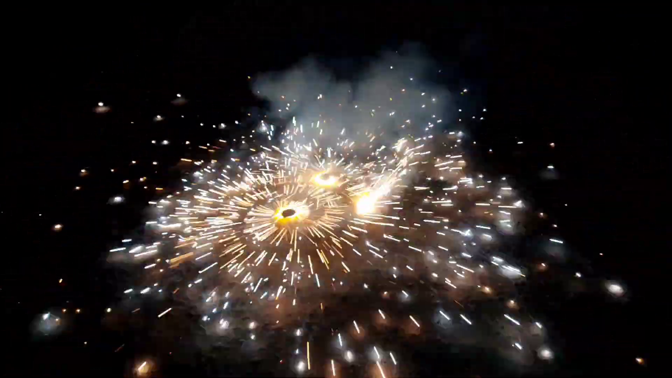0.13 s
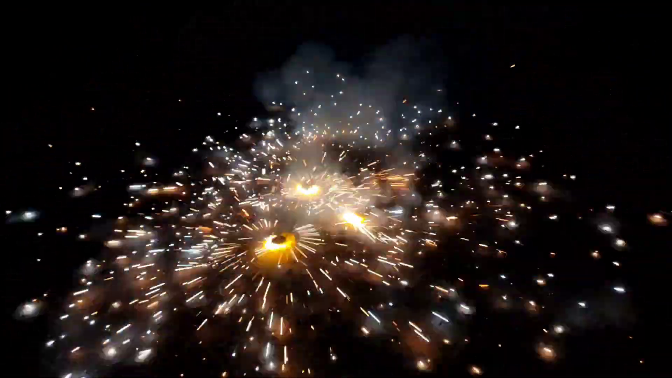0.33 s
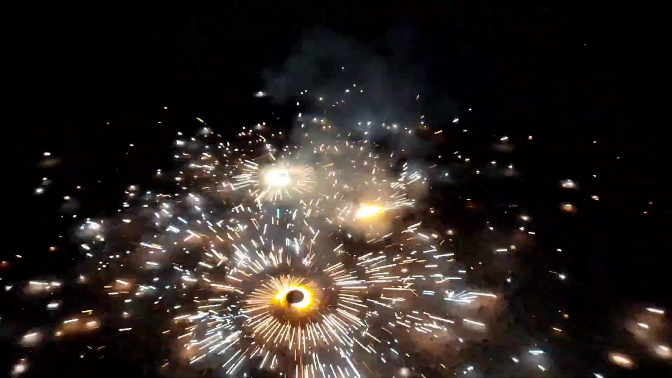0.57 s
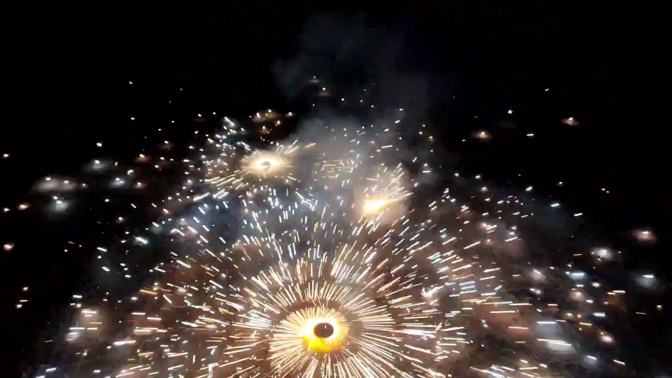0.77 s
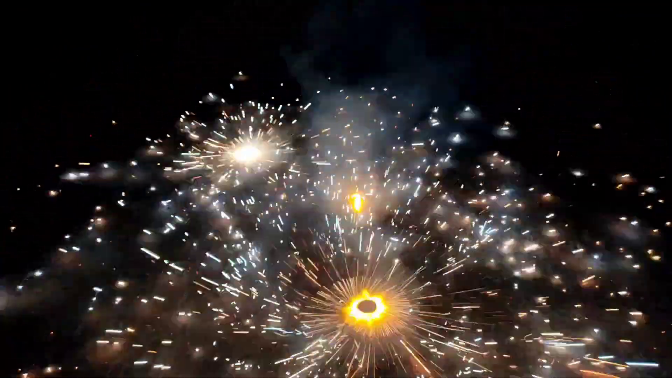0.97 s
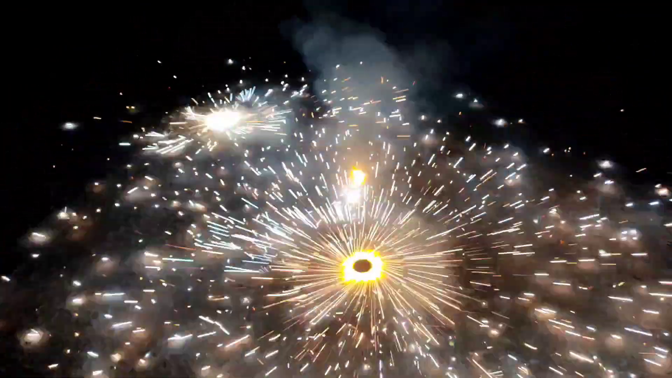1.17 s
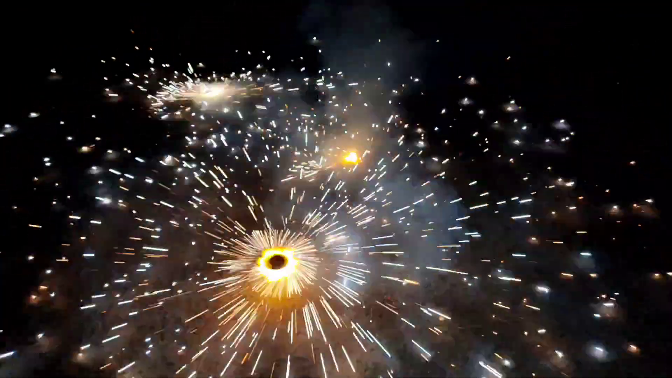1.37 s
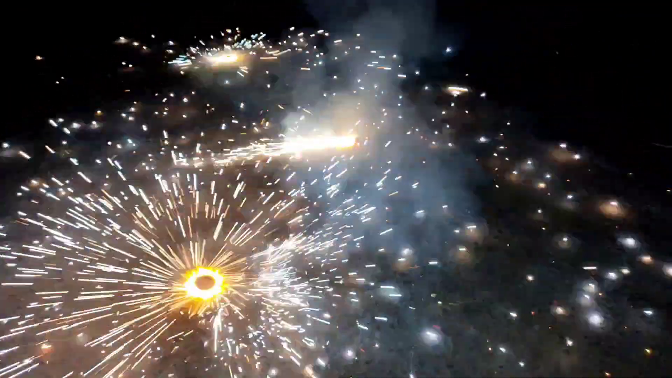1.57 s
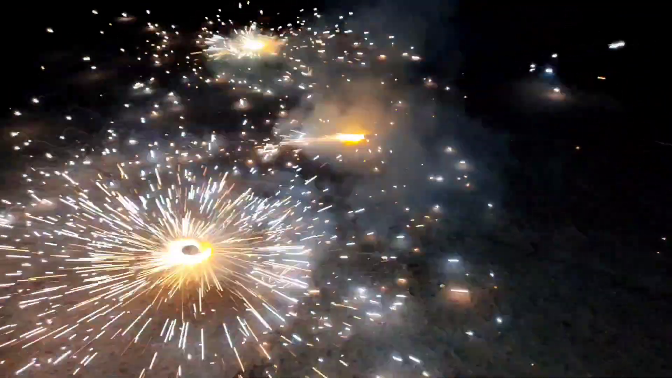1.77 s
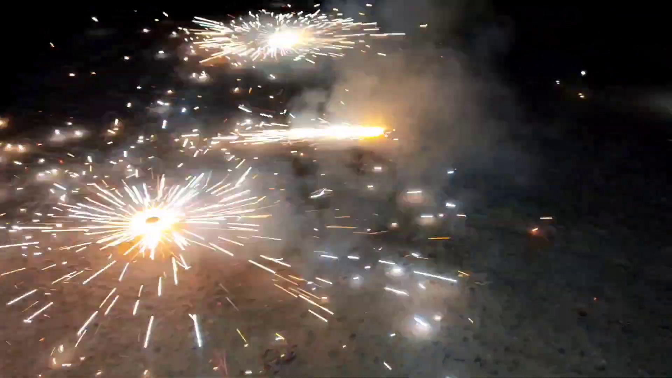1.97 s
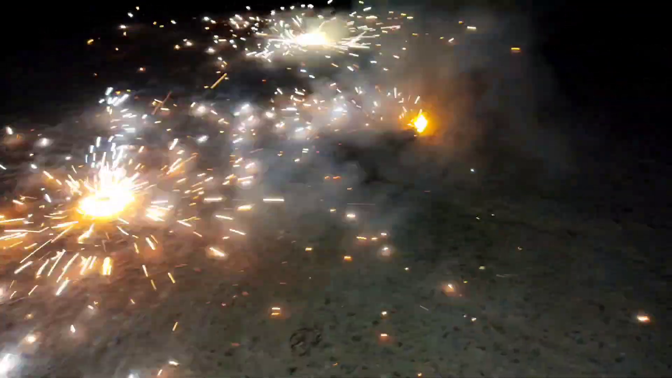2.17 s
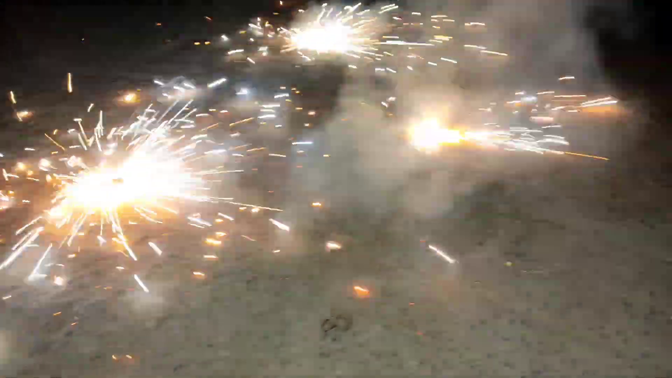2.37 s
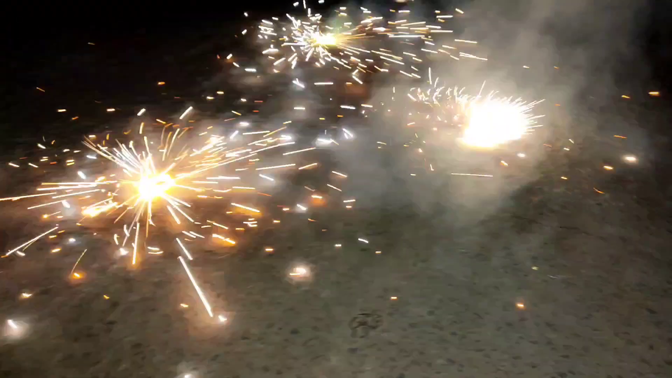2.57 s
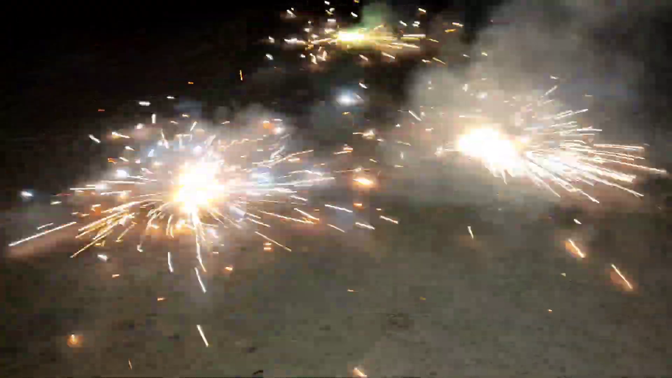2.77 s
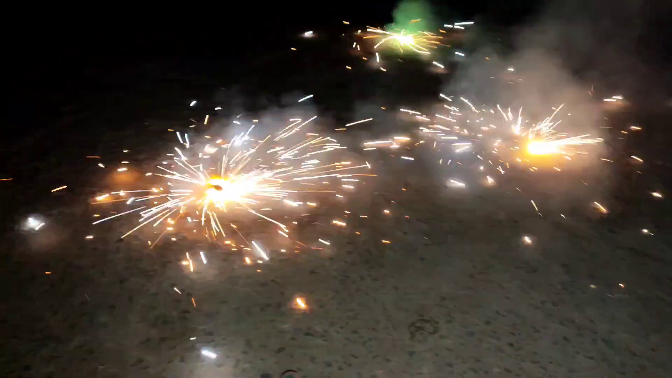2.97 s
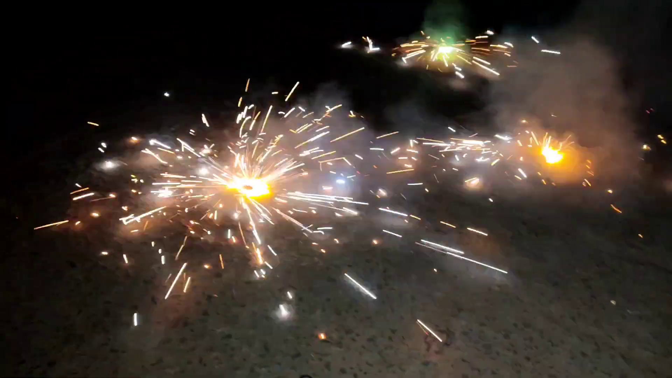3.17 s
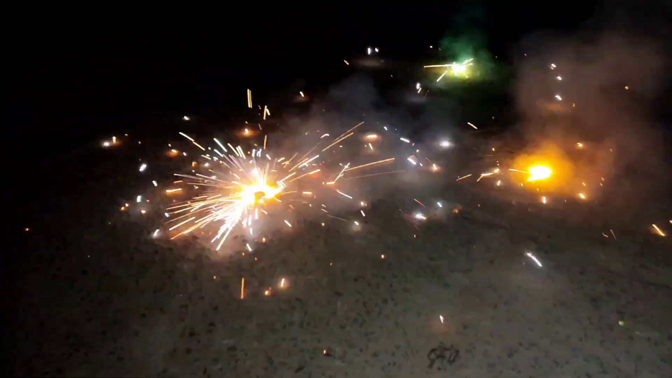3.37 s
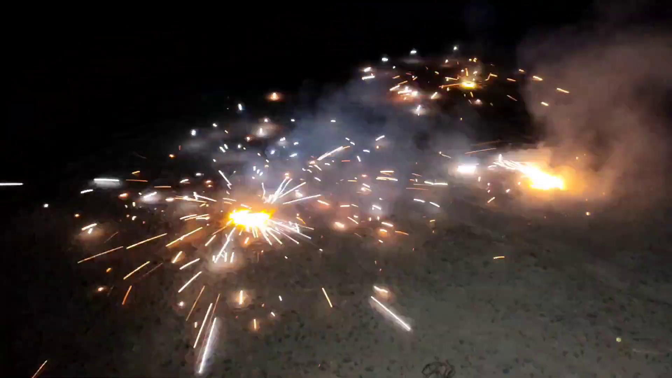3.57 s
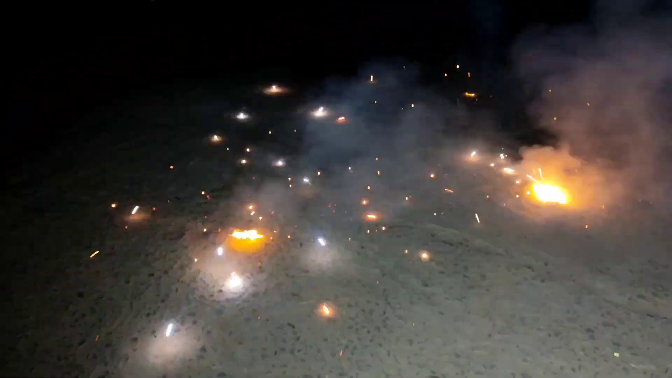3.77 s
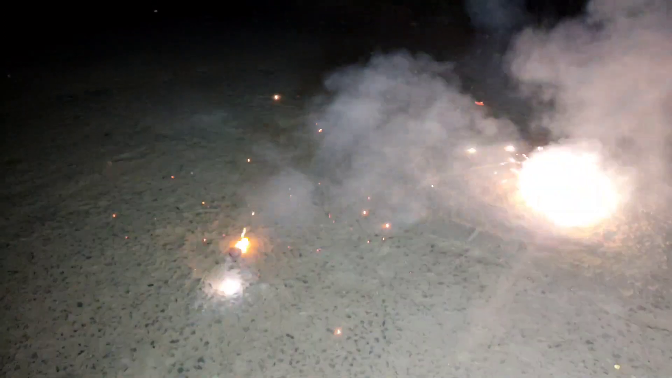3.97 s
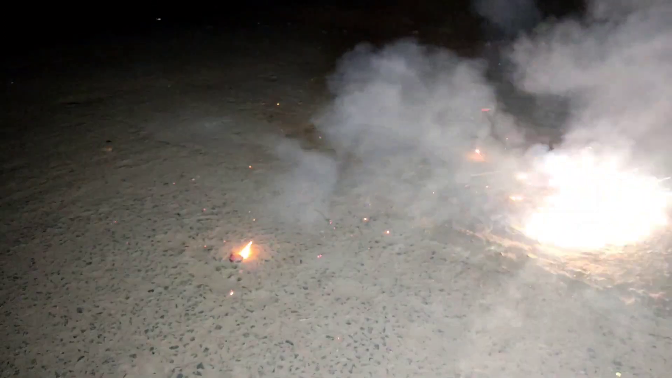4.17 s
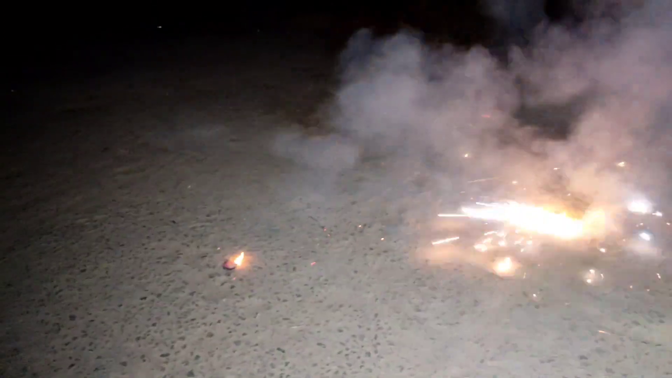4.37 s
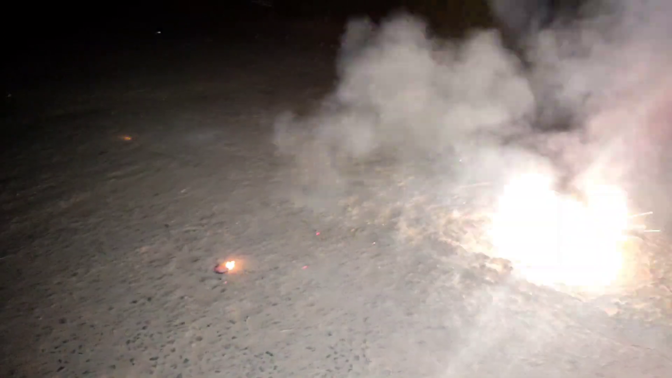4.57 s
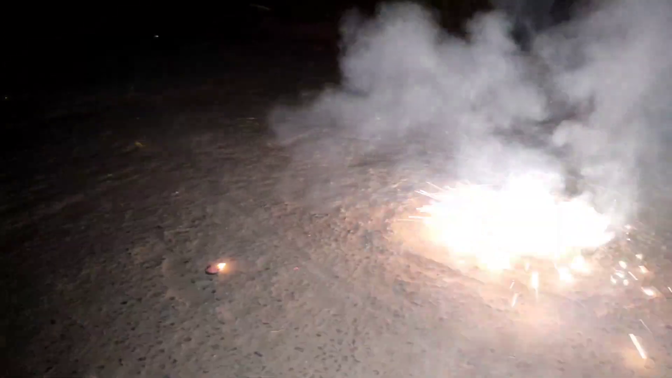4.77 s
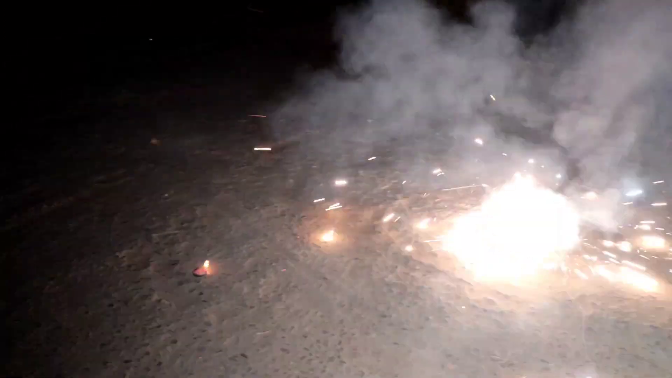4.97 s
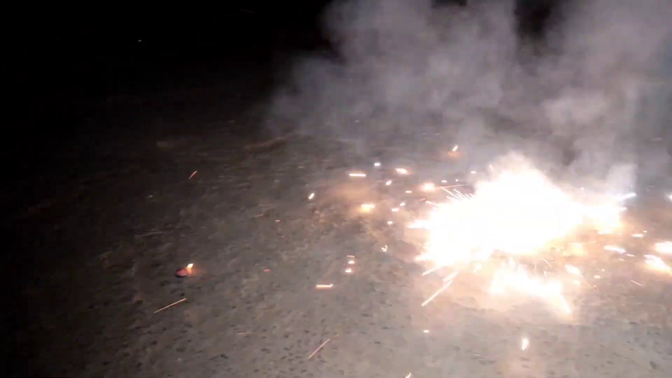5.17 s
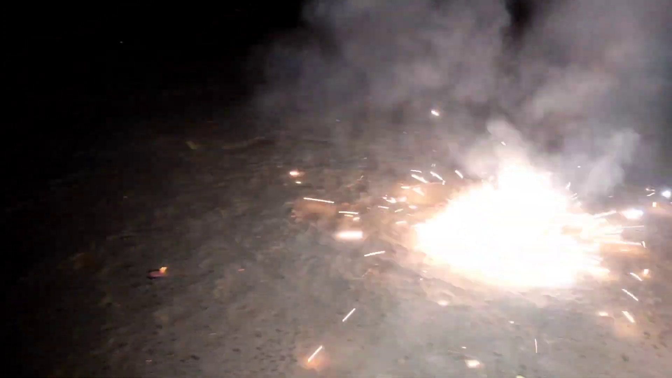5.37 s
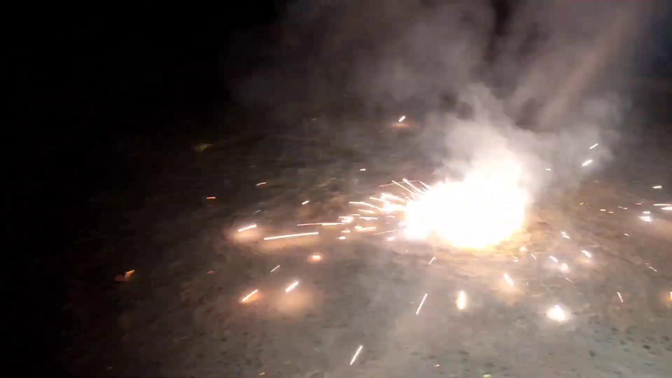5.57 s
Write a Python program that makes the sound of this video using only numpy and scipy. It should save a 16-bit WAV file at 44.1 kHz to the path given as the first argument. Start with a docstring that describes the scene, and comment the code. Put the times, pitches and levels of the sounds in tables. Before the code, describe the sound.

A bright, sizzling spray of sparks and a fluttering rush of burning gas come from ground spinner fireworks wandering near the microphone in an open yard. They surge and spit irregularly, loudest early on, then weaken and die away. A single spinner takes over on the left with a softer hiss that flares, fades and flares again. Light low air rumble and very short echoes lie underneath.

```python
"""A pulsing roar and a bright, crackling hiss: ground spinner fireworks whirl on a concrete yard at night.
Burning gas rushes from each nozzle, pulsing as it turns, and grains of metal burst into spitting sparks.
The group wanders and burns out after four seconds; one last spinner then flares up alone, to the left.
Low gusts and short echoes lie underneath. Two small microphone ports ring near 7-8 kHz."""
import sys
import numpy as np
from scipy import signal
from scipy.fft import rfft, irfft, next_fast_len
from scipy.io import wavfile
from scipy.ndimage import uniform_filter1d, minimum_filter1d, map_coordinates

SR = 44100
rng = np.random.default_rng(int(sys.argv[2]) if len(sys.argv) > 2 else 0)


def dump(signal):
    """Clip the signal to [-1, 1] and save it as 16-bit WAV at the path in sys.argv[1]."""
    limited = np.clip(np.atleast_2d(signal).T, -1, 1)
    pcm = np.round(limited * 32767).astype(np.int16)
    wavfile.write(sys.argv[1], SR, pcm)


N = 247384
TIME = np.arange(N) / SR

# How hard the group's gas burns: time_s, rumble_db, roar_db, rasp_db
GROUP_JET = [(0.0, -43, -33.5, -31), (0.3, -43, -30, -31), (0.41, -41.5, -32.5, -33),
             (0.65, -37.5, -29, -27), (0.79, -35, -28, -29), (0.825, -40, -27, -25.5),
             (0.95, -34, -25.5, -23), (1.0, -33.5, -26.5, -25.5), (1.08, -38, -31.5, -28.5),
             (1.28, -37.5, -32, -28), (1.47, -35.5, -32, -30), (1.52, -37, -31, -45),
             (1.6, -35.5, -30, -35), (1.82, -34.5, -30, -33.5), (2.05, -34.5, -26.5, -31),
             (2.42, -39, -32, -32.5), (3.36, -43.5, -36.5, -32.5), (3.52, -41, -41.5, -39),
             (3.66, -40.5, -34.5, -34), (3.81, -37.5, -34.5, -38), (3.87, -40.5, -38, -44),
             (4.0, -46, -47.5, -56.5)]
# Where the group is: time_s, extra_path_to_left_m, left_minus_right_db, direct_over_scattered_db
GROUP_PATH = [(0, 0.0015, 3, 3.5), (.3, 0.0056, 3.5, -2.5), (.75, 0.022, -1.5, -5.5), (1.1, -0.0078, 0, 0),
              (1.42, -0.0089, -0.5, 5.5), (1.7, 0.036, -2, -2), (1.95, 0.044, -3.5, -5),
              (2.3, 0.069, -3, -3.5), (2.6, 0.094, -2, 0), (2.9, 0.061, -3.5, 0), (3.35, 0.045, -1, 12.5),
              (4.0, 0.033, -2.5, -11.5)]
# The nearest spinner speeds up, then tires: time_s, turns_per_s
GROUP_SPIN = [(0, 60), (.45, 73), (.8, 78), (1.1, 88), (1.33, 103), (1.55, 108), (1.76, 87), (1.9, 48),
              (2.6, 24), (3.5, 22), (4.0, 16)]
# The group's steady stream of sparks: time_s, level_db
GROUP_SPRAY = [(0, -24), (.2, -23.5), (.41, -29.5), (.62, -25.5), (.9, -18.5), (1.14, -25.5), (1.45, -29),
               (1.52, -26), (1.66, -29.5), (1.76, -30), (1.85, -35.5), (1.91, -29), (1.97, -30.5),
               (2.12, -29), (2.3, -33.5), (2.45, -35), (2.65, -32.5), (3.4, -33), (3.52, -41.5),
               (3.62, -37), (3.85, -42), (4.0, -57)]
# Tone of the group's gas: pitch_hz, level_db
GROUP_ROAR = [(60, -31), (115, -19.5), (165, -2.5), (230, -2.5), (310, -3), (400, -7), (490, 0), (800, 3),
              (1100, 6), (1500, 0.5), (2700, -1.5), (3200, -17), (3900, -19), (6000, -12), (8000, -50)]
# Tone of the group's spray: pitch_hz, level_db
GROUP_HISS = [(2200, -25), (3200, -4), (4500, -2.5), (5800, -1.5), (7000, 0), (8000, .5), (9000, 0),
              (11000, -7), (15500, -9)]

def group(flare):
    """Several spinners blow out gas and sparks, pulsing with the turns of the nearest."""
    path_m, balance_db, direct_db = in_time(GROUP_PATH)
    sweep_db = whirl(in_time(GROUP_SPIN)[0], depths_db=[0.24, 0.52, 0.56, 0.3])
    gas = jet(in_time(GROUP_JET), flare, GROUP_ROAR, path_m, direct_db, 0.52 * sweep_db,
              flutter_db=0.6, gains_db=[-0.8, -1.8, -0.3], hollowness=1.74)
    flow = metal_flow(in_time(GROUP_SPRAY)[0], flare)
    hiss = spray(flow, GROUP_HISS, path_m, direct_db, sweep_db,
                 crackle_db=-8.5, hiss_db=-10.5, patchy_db=31.0)
    return gas + panned(hiss, balance_db)


# The last spinner flares, fades and flares again: time_s, rumble_db, roar_db, rasp_db
LAST_JET = [(4.0, -48, -54, -54), (4.1, -47.5, -38.5, -40), (4.21, -46.5, -43.5, -42),
            (4.49, -47, -34.5, -37), (4.64, -49, -44, -48), (4.74, -47.5, -45, -45.5),
            (4.87, -52, -42.5, -41.5), (4.95, -50, -36.5, -40), (5.06, -47, -39, -41),
            (5.14, -48.5, -38.5, -36.5), (5.61, -47.5, -36, -38)]
# Where it is: time_s, extra_path_to_left_m, left_minus_right_db, direct_over_scattered_db
LAST_PATH = [(4.0, -0.064, 2.8, 0.71), (4.5, -0.065, 6.1, 0.85), (5.0, -0.063, 6, 0.88),
             (5.6, -0.039, 3.8, 1)]
# Tone of its gas: pitch_hz, level_db
LAST_ROAR = [(60, -20), (115, -14.5), (160, -3), (260, 2), (390, -3.5), (500, 2.5), (900, 1.5), (1130, 7.5),
             (1400, 1), (1800, 1.5), (2800, -2), (3400, -23), (5000, -14.5), (7000, -17.5)]
# Tone of its spray: pitch_hz, level_db
LAST_HISS = [(2200, -18), (3200, -2), (3700, -3), (4300, -.5), (5800, 0), (6700, -1.5), (7500, 1),
             (8500, 0), (10000, -6.5), (15500, -9)]

def last_spinner(flare):
    """One slow spinner burns to the left; a harder burn drives it faster."""
    path_m, balance_db, direct_db = in_time(LAST_PATH)
    levels_db = in_time(LAST_JET)
    rasp_db = levels_db[2]
    turns_per_s = 26 * 2 ** ((rasp_db + 31.5) / 11.5)   # 11.5 dB more rasp doubles the speed
    sweep_db = whirl(turns_per_s, depths_db=[.6, .5])
    gas = jet(levels_db, flare, LAST_ROAR, path_m, direct_db, 0.13 * sweep_db,
              flutter_db=1.03, gains_db=[-0.8, -1.5, -0.3], hollowness=0.83)
    flow = metal_flow(rasp_db - 1.8, flare)
    hiss = spray(flow, LAST_HISS, path_m, direct_db, sweep_db,
                 crackle_db=-18.5, hiss_db=-6.5, patchy_db=6.5)
    return panned(gas, 0.19 * balance_db) + panned(hiss, balance_db)


def whirl(turns_per_s, depths_db):
    """The level swings, in dB, as the nozzle sweeps past; its narrow beam adds faster ripples."""
    angle = 2 * np.pi * np.cumsum(turns_per_s) / SR
    return sum(db * np.cos(k * angle + rng.uniform(0, 2 * np.pi)) for k, db in enumerate(depths_db, 1))


# A hollow note in the roar, shifting as the spinners wander: time_s, pitch_hz
HOLLOW_NOTE = [(0, 460), (1.2, 524), (2.0, 550), (2.4, 580), (3.3, 610), (3.7, 590), (5.6, 620)]

def jet(levels_db, flare, spectrum, path_m, direct_db, sweep_db, flutter_db, gains_db, hollowness):
    """Burning gas: low rumble, hollow roar and high rasp, all shaken by the uneven burn."""
    rest = resonance(turbulence(spectrum, path_m, direct_db), HOLLOW_NOTE, width_hz=166, boost=hollowness)
    bands = []
    for edge_hz in (380, 1400):   # split off the rumble, then the roar
        low = signal.sosfiltfilt(signal.butter(4, edge_hz, fs=SR, output="sos"), rest)
        bands.append(low)
        rest = rest - low
    bands.append(patchy(rest, depth_db=4.0))
    rumble, roar, rasp = [from_db(db + gain) for db, gain in zip(levels_db, gains_db)]
    rasp = np.hypot(rasp, from_db(-16.5) * flare)   # flares feed the rasp
    gas = sum(level * rms_one(band) for band, level in zip(bands, (rumble, roar, rasp)))
    return gas * from_db(sweep_db + flutter_db * drift(rate_hz=42))


# A bright ring in the hiss, wandering with the spinners: time_s, pitch_hz
HISS_PEAK = [(0, 6300), (.3, 6400), (.55, 8600), (.72, 6950), (1.0, 7400), (1.1, 7300), (1.36, 6150),
             (1.52, 8350), (1.9, 7740), (2.21, 6900), (2.56, 8800), (2.67, 6500), (2.87, 7400),
             (3.35, 7700), (3.8, 7400), (4.1, 6700), (4.46, 8350), (4.8, 7700), (5.6, 7800)]

def spray(flow, spectrum, path_m, direct_db, sweep_db, crackle_db, hiss_db, patchy_db):
    """Burning metal sprays out: a sputtering hiss with the crackle of sparks in it."""
    hiss = from_db(hiss_db) * patchy(turbulence(spectrum, path_m, direct_db), patchy_db)
    ticks = sparks(per_s=1500, spread_db=1.0, path_m=path_m)
    crackle = from_db(crackle_db) * rms_one(colour(ticks, spectrum))
    return resonance(hiss + crackle, HISS_PEAK, width_hz=2400, boost=0.51) * flow * from_db(sweep_db)


def metal_flow(steady_db, flare):
    """Loudness of the burning metal: a sputtering stream with the flares on top."""
    sputter_db = -0.4 * drift(rate_hz=30)
    return np.hypot(from_db(steady_db + sputter_db), from_db(-4) * flare)


def sparks(per_s, spread_db, path_m):
    """Grains of metal burst at random: many tiny ticks and a few strong ones."""
    sizes = from_db(spread_db * np.minimum(rng.exponential(1, N), 5)) * rng.choice([-1, 1], N)
    ticks = sizes * (rng.random(N) < per_s / SR)
    return rms_one(yard(at_ports(ticks, path_m), fade_s=0.12, wet_db=5.0))


# Lumps of powder flaring in a nozzle: start_s, length_s, level_db
FLARES = [(0.0, 0.013, -17), (0.082, 0.045, -20.5), (0.435, 0.16, -25), (0.635, 0.065, -20.5),
          (0.705, 0.062, -27), (0.812, 0.1, -18), (0.945, 0.046, -21), (1.068, 0.039, -21),
          (1.19, 0.1, -18.5), (1.305, 0.084, -19), (1.44, 0.041, -21.5), (1.512, 0.056, -26.5),
          (1.562, 0.039, -20.5), (1.705, 0.049, -23), (2.145, 0.11, -24.5), (2.485, 0.036, -23.5),
          (2.525, 0.07, -19), (2.617, 0.023, -21), (2.66, 0.018, -22), (2.70, 0.018, -23),
          (2.735, 0.023, -28), (2.802, 0.076, -22), (2.895, 0.018, -25), (2.932, 0.031, -23),
          (2.974, 0.014, -19), (3.09, 0.027, -31), (3.142, 0.012, -24), (3.222, 0.071, -24.5),
          (3.312, 0.045, -24), (3.392, 0.022, -24), (3.435, 0.017, -27), (3.658, 0.087, -32),
          (3.76, 0.028, -36), (3.806, 0.024, -32), (4.098, 0.058, -36.5), (4.31, 0.14, -29.5),
          (4.415, 0.078, -25.5), (4.758, 0.032, -32), (5.098, 0.079, -33), (5.298, 0.075, -32.5),
          (5.468, 0.066, -32), (5.572, .04, -29)]
# Sharp spits, as a grain of metal bursts in the nozzle: start_s, length_s, level_db
SPITS = [(0.639, 0.0053, -16.5), (0.751, .004, -24), (0.812, .007, -16.5), (0.831, 0.0072, -14),
         (0.958, .006, -22), (1.214, 0.0045, -19), (1.266, .005, -14.5), (1.337, 0.01, -19),
         (1.734, .005, -17.5), (2.098, 0.0037, -32), (2.176, .004, -18), (2.213, .01, -18.5),
         (2.235, .007, -23), (2.579, 0.01, -19.5), (2.828, 0.0038, -13), (2.853, .003, -22),
         (2.861, .003, -25), (2.941, 0.0076, -22), (3.11, .008, -22), (3.265, 0.0043, -19),
         (3.349, .004, -28), (3.364, 0.0098, -23), (3.409, .006, -32), (3.809, .006, -32), (3.9, .007, -39),
         (4.013, .002, -50), (4.102, .007, -37), (5.122, 0.0087, -30), (5.322, 0.014, -31),
         (5.345, .008, -32), (5.482, .011, -30)]

def flare_ups():
    """Loudness of the sudden surges: powder flares softly, metal spits sharply."""
    powder = swells(FLARES, attack_s=.004, release_s=.014)
    metal = swells(SPITS, attack_s=.001, release_s=.006)
    return np.hypot(powder, metal)


# Strength and side of the lower hiss: time_s, boost_db, left_minus_right_db
LOW_HISS = [(0, -1.5, -1), (.4, 0.5, -3.5), (.75, 2.5, 1), (.85, 1, 3), (1.1, 2, -0.5), (1.4, 2, -0.5),
            (1.53, 0.5, 1), (1.8, 2.5, 1), (2.2, 3.5, 1.5), (2.4, 7.5, 3), (2.55, 0, 0), (2.8, 2.5, 1),
            (3.8, 4, -0.5), (4.45, 1, -2.5), (4.7, 2.5, -2), (5.0, 2, -3.5), (5.4, 2.5, -2)]

def low_hiss(x):
    """The lower part of the hiss fills out, thins and leans from side to side."""
    boost_db, balance_db = in_time(LOW_HISS)
    band = signal.sosfiltfilt(signal.butter(2, (2900, 6000), "band", fs=SR, output="sos"), x)
    return x - band + from_db(boost_db) * panned(band, balance_db)


# Share of the finest sparks in the spray: time_s, share_db
FINE_SPARKS = [(0, 0.5), (.3, -3), (.6, -9.5), (1.0, -2), (1.55, -0.5), (1.85, -2), (2.3, -5), (3.7, 1),
               (4.4, -13), (5.0, -7), (5.15, -5.5), (5.6, -7)]
# Tone of their sizzle: pitch_hz, level_db
FIZZ_TONE = [(7500, -58), (9600, 2.5), (11000, 4.5), (15500, 6)]

def fizz(flare):
    """Clusters of tiny sparks sizzle above the hiss, swelling and thinning with the burn."""
    share_db, = in_time(FINE_SPARKS)
    rasp_db = in_turn(GROUP_JET, LAST_JET)[2]
    path_m = in_turn(GROUP_PATH, LAST_PATH)[0]
    ticks = sparks(per_s=7000, spread_db=4.6, path_m=path_m)
    cloud = patchy(colour(ticks, FIZZ_TONE), depth_db=9)
    return cloud * metal_flow(rasp_db + 3.5, flare) * from_db(share_db + 3.0 * drift(rate_hz=14))


# Low puffs from a nozzle: start_s, length_s, level_db
CHUFFS = [(0.945, 0.052, -36), (2.68, 0.022, -40), (3.785, .016, -36), (5.292, 0.022, -43)]
# Tone of a puff: pitch_hz, level_db
CHUFF_TONE = [(60, -25), (120, -23), (190, -3), (330, 1.5), (600, -15), (1400, -51)]

def chuffs():
    """A choking nozzle coughs out short, low puffs of gas."""
    gas = turbulence(CHUFF_TONE, path_m=0, direct_db=2)
    return gas * swells(CHUFFS, attack_s=0.0027, release_s=0.0087)


# Gusts of hot air under the roar: start_s, length_s, level_db
GUSTS = [(0.0, 0.14, -48), (0.3, 0.22, -49), (0.84, 0.11, -41), (0.965, 0.04, -37), (1.09, 0.42, -44.5),
         (1.62, 0.17, -46), (1.93, 0.14, -42), (2.3, 0.26, -54), (2.98, 0.042, -44), (3.42, 0.33, -51.5),
         (3.77, 0.039, -50)]
# Tone of the moving air: pitch_hz, level_db
GUST_TONE = [(15, -30), (28, -16), (55, -0.5), (85, 9), (120, 6), (200, -41), (600, -70)]

def gusts():
    """Low, lumpy air noise: a draught that follows the rumble, plus single gusts."""
    draught = from_db(in_turn(GROUP_JET, LAST_JET)[0] - 18)
    level = np.hypot(draught, swells(GUSTS, attack_s=0.022, release_s=0.04))
    air = turbulence(GUST_TONE, path_m=0, direct_db=2)
    return air * level * from_db(-3.0 + 1.5 * drift(rate_hz=13.0))


# Sound bounced off ground and walls: pitch_hz, level_over_direct_db
SCATTER = [(60, -29), (150, -72), (300, -38), (600, -21.5), (1200, -6.5), (2300, 0), (3400, -6), (4500, -3),
           (7000, -0.5), (8500, 5.5), (15000, -36)]

def turbulence(spectrum, path_m, direct_db):
    """Noise of swirling gas: part arrives straight, part is scattered and differs at each port."""
    direct_share = [(hz, -10 * np.log10(1 + from_db(db) ** 2)) for hz, db in SCATTER]
    direct = at_ports(colour(rng.standard_normal(N), spectrum, direct_share), path_m)
    scattered = colour(rng.standard_normal((2, N)), spectrum, direct_share, SCATTER)
    gain = from_db(direct_db)
    return rms_one((gain * direct + scattered) / np.sqrt(1 + gain ** 2))


def yard(x, fade_s, wet_db):
    """Sparse echoes off ground and walls, dying by 60 dB in fade_s."""
    t = TIME[:SR // 3]
    echoes = rng.standard_normal((2, len(t))) * (rng.random((2, len(t))) < .05)
    echoes *= from_db(-60 * t / fade_s)
    echoes /= np.sqrt(np.sum(echoes ** 2, axis=1, keepdims=True))
    return x + from_db(wet_db) * signal.fftconvolve(x, echoes, axes=1)[:, :N]


def patchy(x, depth_db, size=512):
    """The sound flickers: narrow pitch regions swell and sink every few hundredths of a second."""
    frames = signal.stft(x, nperseg=size)[2]
    chance = uniform_filter1d(rng.standard_normal(frames.shape[1:]), size=3, axis=0)
    chance = rms_one(uniform_filter1d(chance, size=5, axis=1))
    frames = frames * from_db(depth_db * np.minimum(chance, 1))
    return rms_one(signal.istft(frames, nperseg=size)[1][:, :N])


def swells(rows, attack_s, release_s):
    """Loudness of a run of events: each builds up, holds and dies away; their powers add."""
    power = np.zeros(N)
    for start_s, length_s, db in rows:
        first = max(int((start_s - 8 * attack_s) * SR), 0)
        span = slice(first, int((start_s + length_s + 8 * release_s) * SR))
        age = TIME[span] - start_s
        rise = 1 / (1 + np.exp(-age / attack_s))
        fall = np.exp(-np.maximum(age - length_s, 0) / release_s)
        power[span] += (from_db(db) * rise * fall) ** 2
    return np.sqrt(power)


def resonance(x, glide, width_hz, boost):
    """Add a ring whose pitch glides in small steps."""
    pitch_hz, = in_time(glide)
    r = np.exp(-np.pi * width_hz / SR)
    zeros = np.array([1, 0, -1]) * (1 - r * r) / 2
    state, ringing = np.zeros((2, 2)), []
    for i in range(0, N, 512):
        poles = [1, -2 * r * np.cos(2 * np.pi * pitch_hz[i] / SR), r * r]
        block, state = signal.lfilter(zeros, poles, x[:, i:i + 512], zi=state)
        ringing.append(block)
    return x + boost * np.hstack(ringing)


def colour(x, *spectra):
    """Shape the tone with one or more tables of pitch_hz, level_db."""
    size = next_fast_len(N + 2048)
    log_hz = np.log(np.arange(size // 2 + 1) * SR / size + 1)
    db = sum(np.interp(log_hz, np.log(hz), levels) for hz, levels in map(np.transpose, spectra))
    return irfft(rfft(x, size) * from_db(db), size)[..., :N]


def drift(rate_hz):
    """A smooth random wobble with a typical size of 1."""
    r = np.exp(-40 * np.pi * rate_hz / SR)
    slow = signal.lfilter([1], [1, -2 * r, r * r], rng.standard_normal(N // 20 + 2002))[2000:]
    return np.interp(np.arange(N) / 20, np.arange(len(slow)), rms_one(slow))


def at_ports(x, path_m):
    """A sound from one side reaches the far microphone port later."""
    lag = path_m / 343 * SR / 2   # sound travels 343 m/s
    return np.array([map_coordinates(x, [np.arange(N) - side * lag], order=3, mode="nearest")
                     for side in (1, -1)])


def panned(x, balance_db):
    """Share the level between the sides; positive leans left."""
    return x * from_db(np.array([balance_db, -balance_db]) / 2)


def in_time(rows):
    """Turn a table that starts with time_s into one curve for each other column."""
    time_s, *columns = np.transpose(rows)
    return [np.interp(TIME, time_s, column) for column in columns]


def in_turn(earlier, later):
    """Curves from two tables, one taking over where the other ends."""
    return in_time(list(earlier[:-1]) + list(later))


def from_db(db):
    """Decibels to gain."""
    return 10 ** (np.asarray(db) / 20)


def rms_one(x):
    """Scale to an average power of 1."""
    return x / np.sqrt(np.mean(x ** 2) + 1e-20)


def limiter(x, ceiling=.78, size=128):
    """Turn both sides down for a few milliseconds around the highest peaks."""
    gain = ceiling / np.maximum(np.abs(x).max(axis=0), ceiling)
    return x * uniform_filter1d(minimum_filter1d(gain, size), size)


def scene():
    """The group dies away as the last spinner takes over."""
    handover = np.clip((TIME - 3.98) / .04, 0, 1)
    flare = flare_ups()
    spinners = np.sqrt(1 - handover) * group(flare) + np.sqrt(handover) * last_spinner(flare)
    spinners = low_hiss(spinners) + chuffs() + fizz(flare)
    return yard(spinners, fade_s=0.08, wet_db=-21.0) + gusts()


# Echoes off surfaces close to the ports: left_delay_s, right_delay_s, level_db
NEAR_ECHOES = [(.00145, .0014, -21), (.0023, .0029, -21), (.0047, .0041, -19), (.0071, .0083, -19)]
# Tone of the left microphone port: pitch_hz, level_db
LEFT_PORT = [(100, .6), (600, .7), (2500, 0), (3300, 3), (3800, 1), (4400, -3), (6000, -1.5), (6600, 1.5),
             (7150, 2), (7650, 5.5), (8000, 5), (8500, 7), (8900, 6), (9150, 3.5), (9600, -7), (9850, -5.5),
             (11000, -12), (15500, -19)]
# Tone of the right microphone port: pitch_hz, level_db
RIGHT_PORT = [(100, -.6), (600, -.7), (2500, 0), (3300, 3), (5000, 2.5), (6000, 5), (6600, 8.5),
              (7100, 12.5), (7600, 13), (8100, 9), (8800, 6), (9200, 2.5), (9600, -9), (9850, -6.5),
              (11000, -12), (15500, -19)]

def record(dry):
    """Close echoes shift as the hand-held microphone sways; each port rings, and the top treble is cut."""
    heard = dry.copy()
    for *delays_s, db in NEAR_ECHOES:
        sway_s = .00008 * drift(rate_hz=0.73)
        for side, delay_s in enumerate(delays_s):
            heard[side] += from_db(db) * np.interp(TIME - delay_s - sway_s, TIME, dry[side], left=0)
    heard = np.array([colour(heard[0], LEFT_PORT), colour(heard[1], RIGHT_PORT)])
    treble_cut = signal.ellip(12, .1, 80, 15600, fs=SR, output="sos")
    return signal.sosfilt(treble_cut, limiter(heard))


dry = scene()
out = record(dry)
dump(out)
```